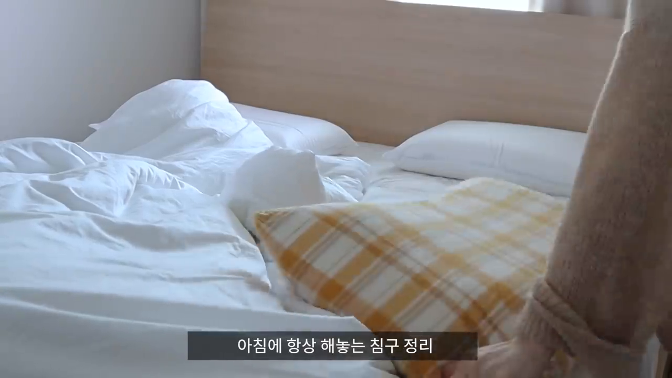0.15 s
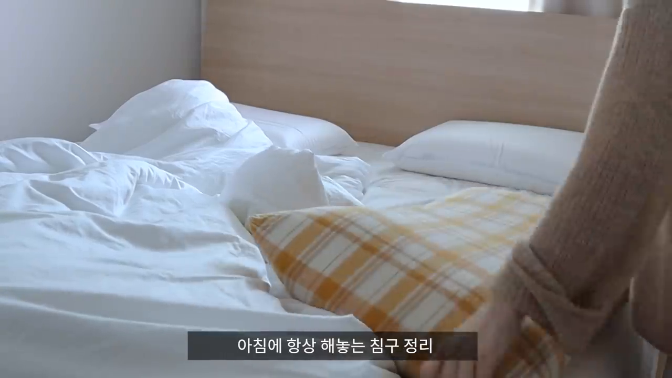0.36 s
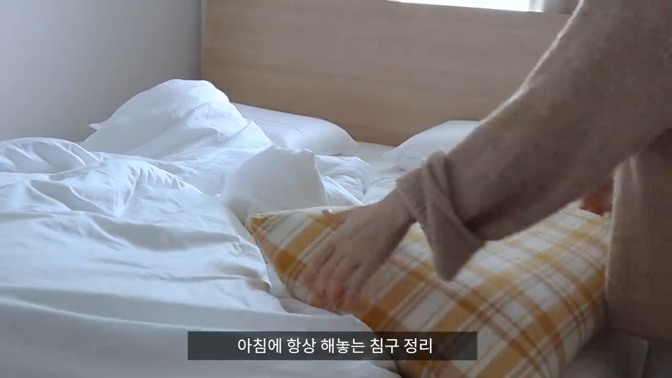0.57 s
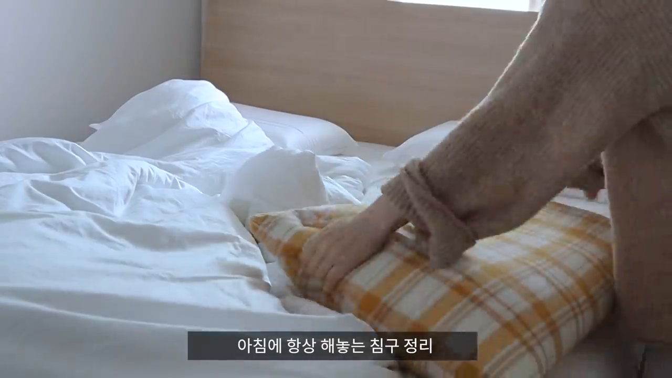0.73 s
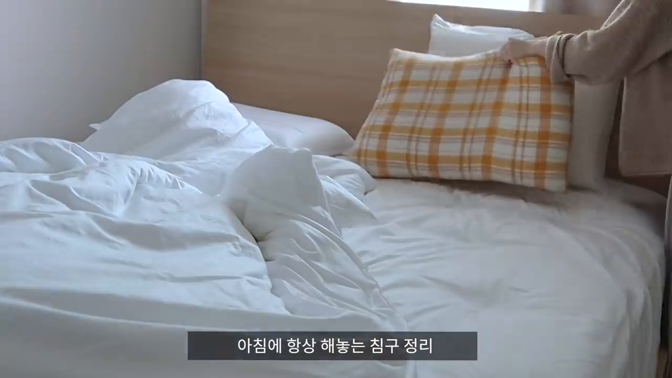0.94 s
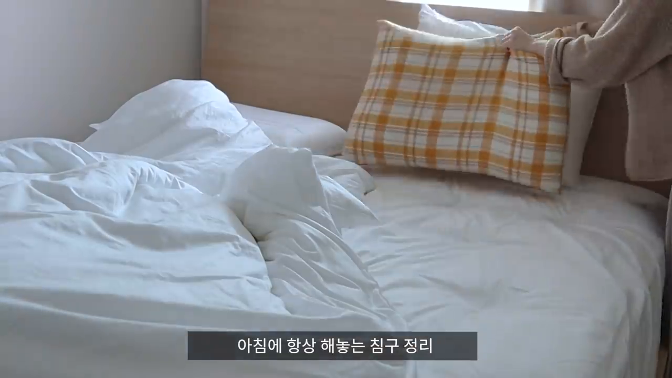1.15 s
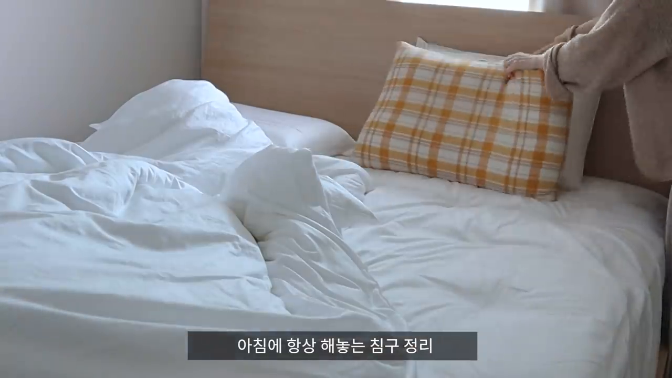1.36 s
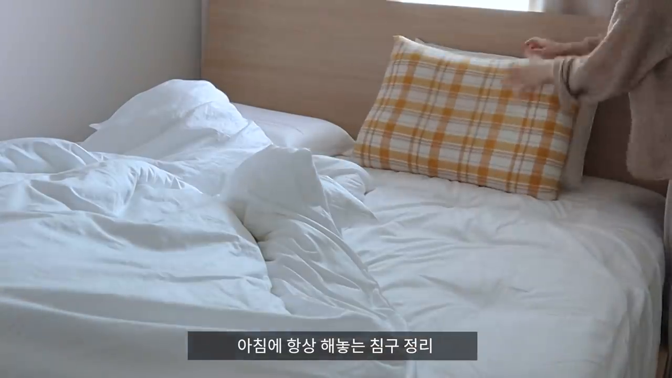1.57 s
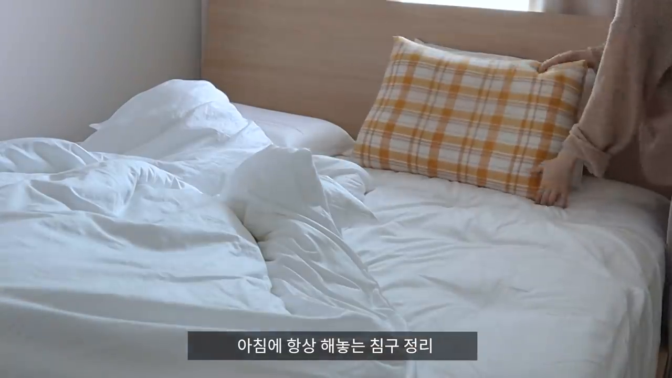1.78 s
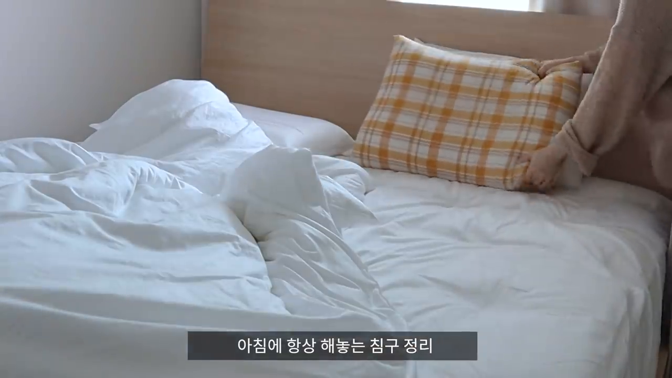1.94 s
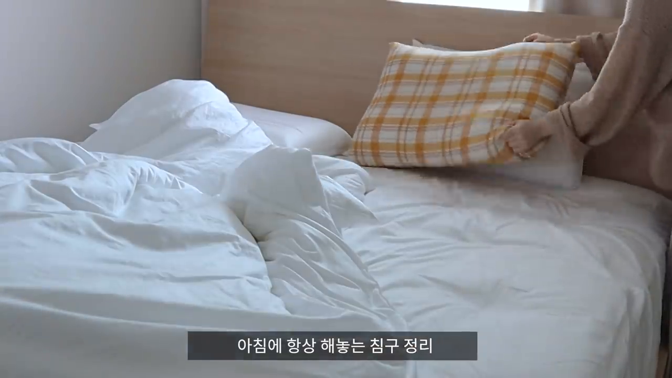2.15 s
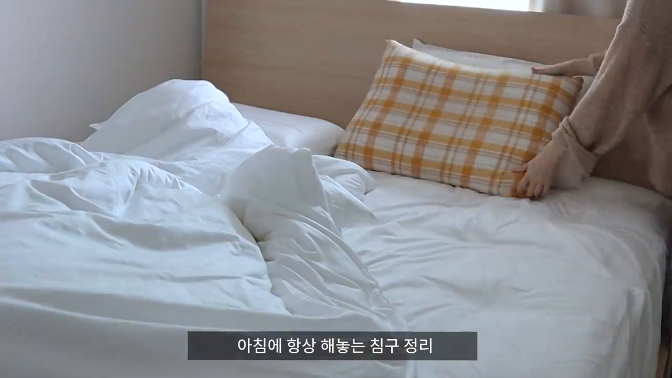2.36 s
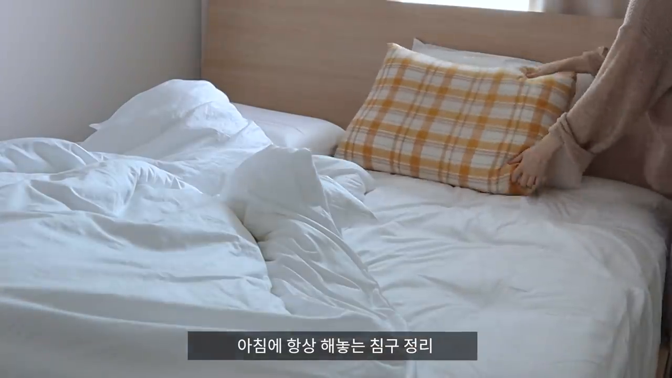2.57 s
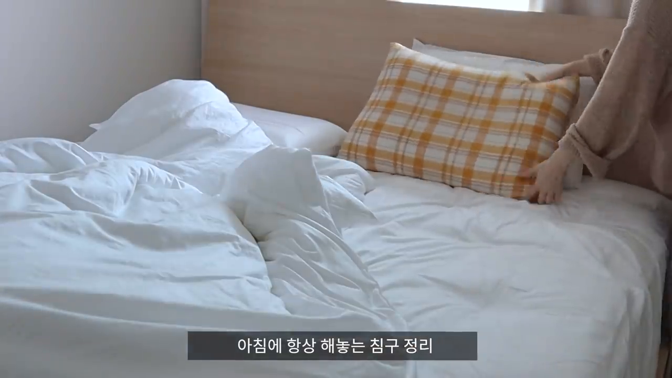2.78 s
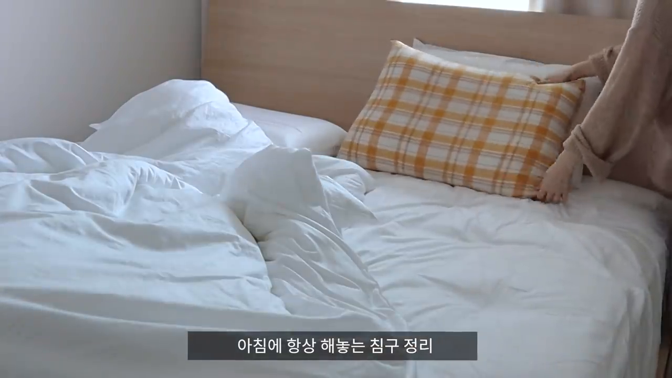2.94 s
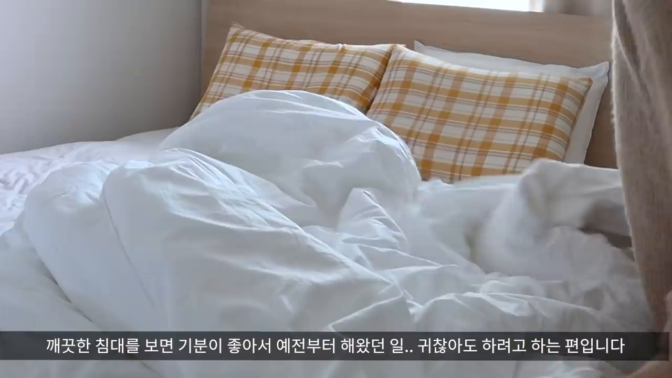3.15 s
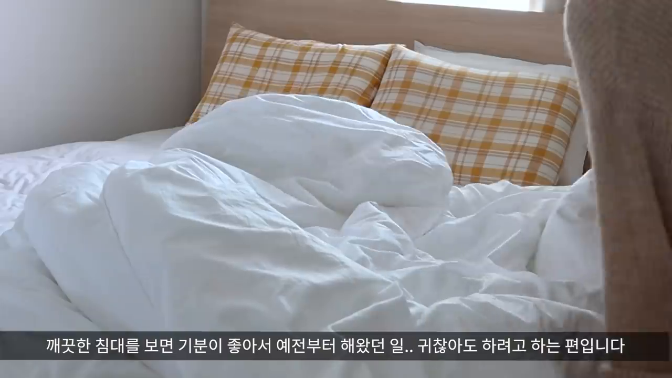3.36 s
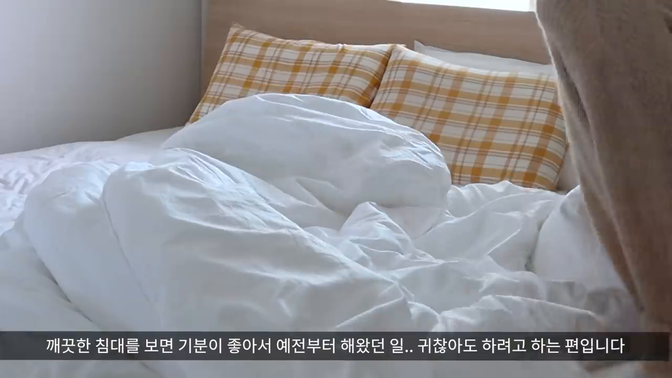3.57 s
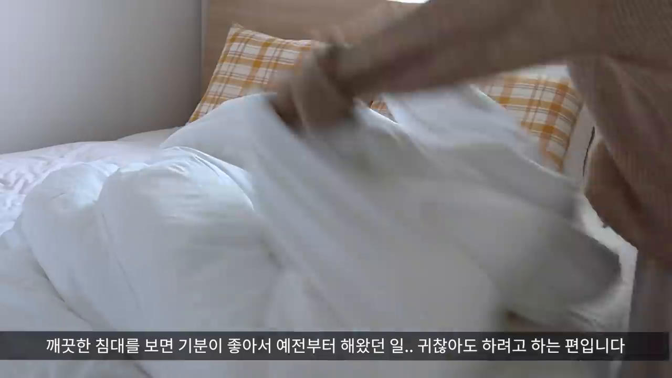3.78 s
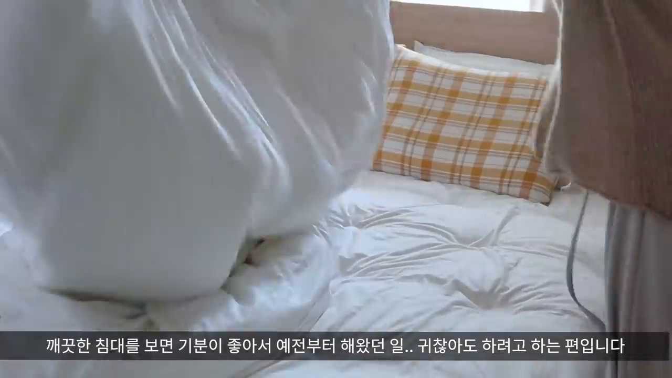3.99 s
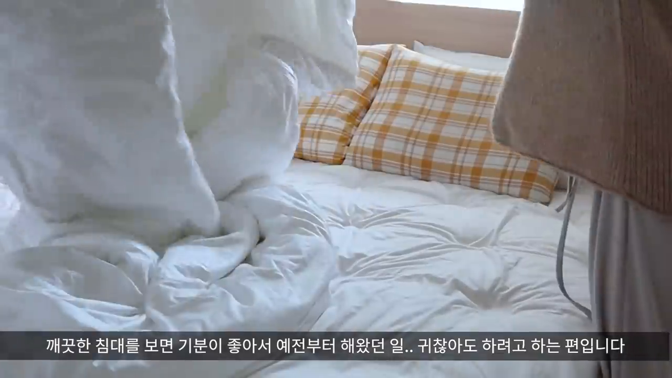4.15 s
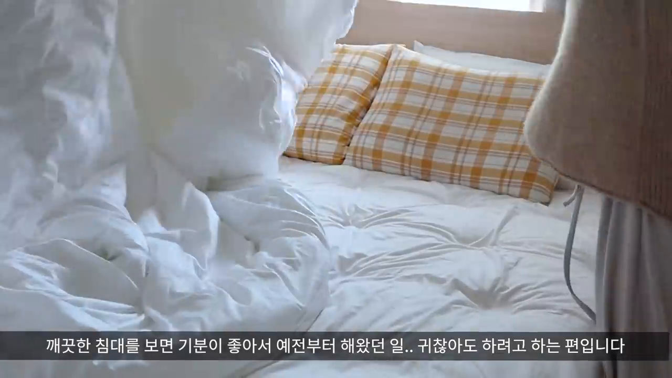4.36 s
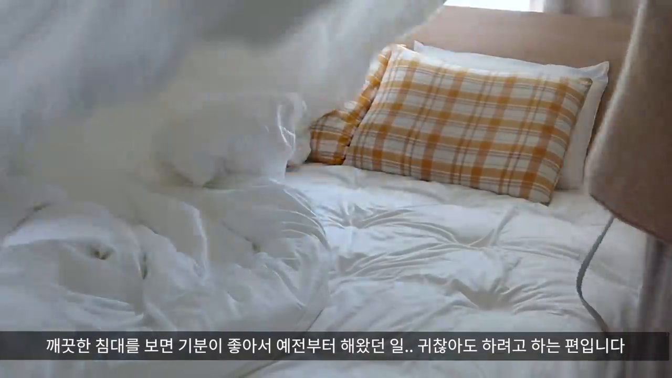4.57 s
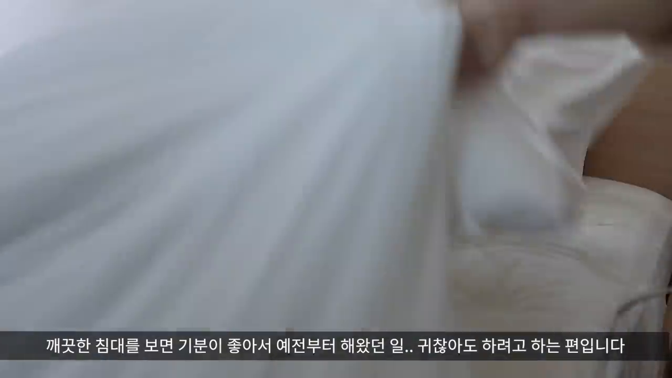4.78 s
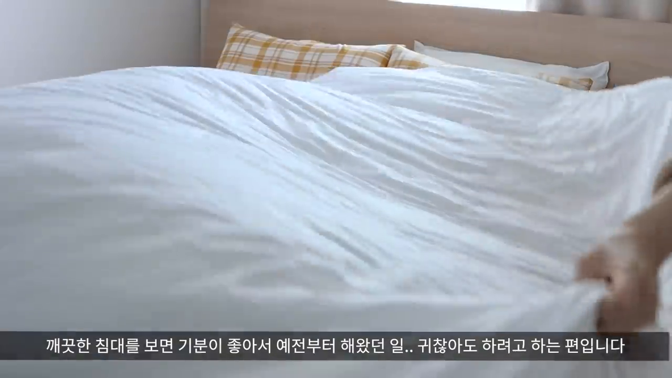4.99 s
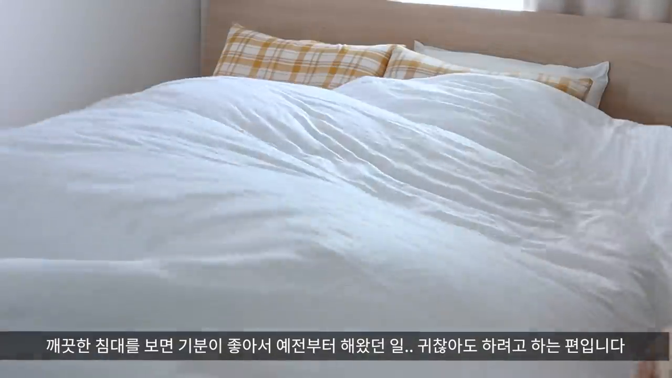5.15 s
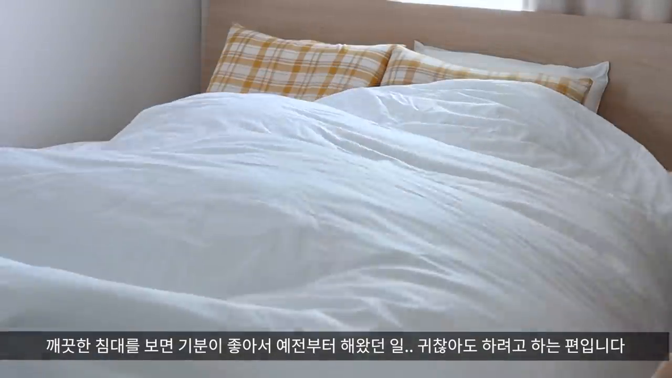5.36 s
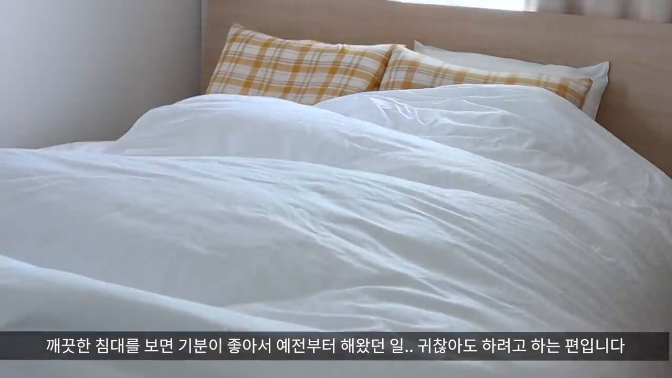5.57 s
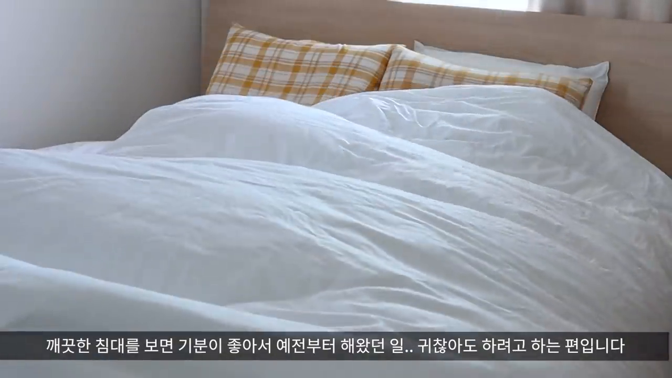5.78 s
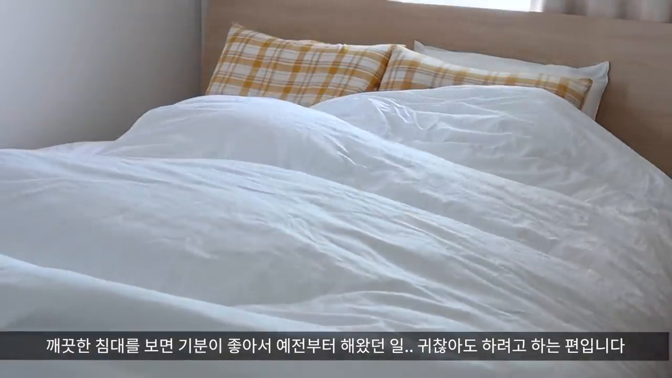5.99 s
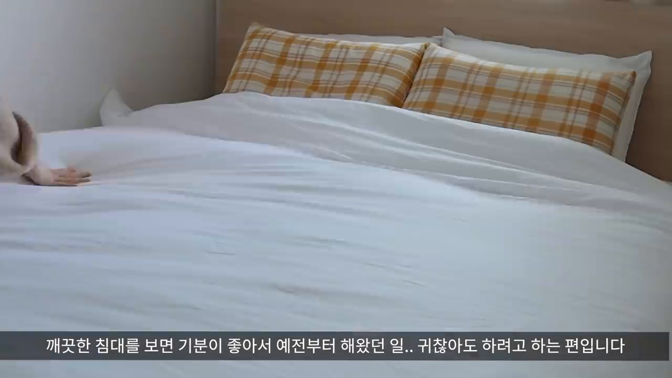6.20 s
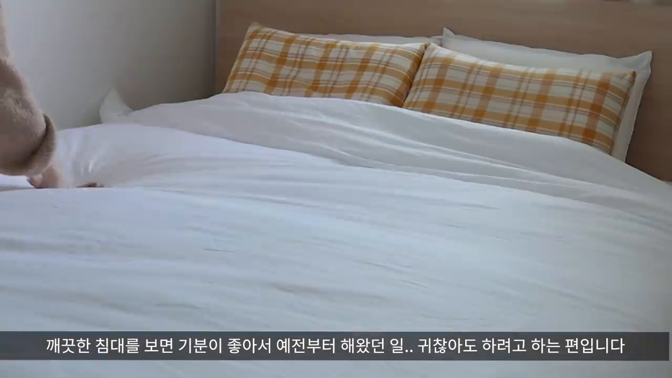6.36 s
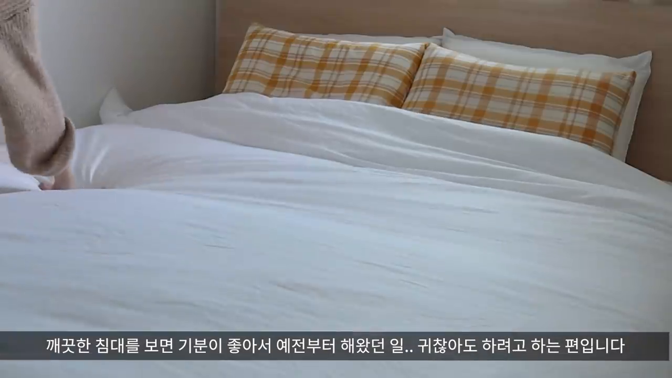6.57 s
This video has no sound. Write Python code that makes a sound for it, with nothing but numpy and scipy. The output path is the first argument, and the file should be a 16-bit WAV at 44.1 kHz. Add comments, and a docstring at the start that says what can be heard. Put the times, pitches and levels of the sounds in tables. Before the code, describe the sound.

Bedding handled by hand, heard closely in stereo in a small soft-sounding bedroom with a faint low hush. First comes a heavy pillow drop, then sparse pats, brief scuffs and rustles. A duvet follows, loudest around four seconds, crumpling and flapping with puffs of low air, a small hollow double knock and a sharp cloth snap. It falls nearly quiet, then ends with a light pat and hissing hand strokes.

```python
"""Making a bed in a small quiet bedroom

A pillow is dropped, stood against the headboard and patted, then the duvet is gathered, shaken out and
smoothed by hand. Crowds of random clicks, coloured and shaped, make folds that pop dully, creases that
crackle and cotton that hisses. Smooth pulses and fading tones make slaps, hollow knocks and a mattress
bounce; slow noise is the stirred air and the hush of the room."""
import sys
import numpy as np
from scipy import signal
from scipy.fft import rfft, irfft, next_fast_len
from scipy.io import wavfile

SR = 44100
rng = np.random.default_rng(int(sys.argv[2]) if len(sys.argv) > 2 else 0)


def dump_mix(stems):
    """Bounce the given channels to the path in sys.argv[1] as a 16-bit WAV at rate SR."""
    frames = np.atleast_2d(stems).T  # one column per channel
    limited = np.clip(frames, -1, 1)  # hard clip at full scale
    pcm = np.round(limited * 32767).astype(np.int16)
    wavfile.write(sys.argv[1], SR, pcm)


N = 292383
TIME = np.arange(N) / SR   # seconds


def moves():
    """Gains of folds, creases and sliding: each move of the hands rises, goes on and dies away; powers add."""
    # From dropping the pillow to smoothing the duvet. Each row: start in seconds, end in seconds,
    # attack in seconds, then relative levels in dB of big folds, small creases and sliding.
    move_list = [(0.061, 0.19, 0.046, -56, -61, -53), (0.234, 0.369, 0.095, -52.5, -51, -51),
                 (0.696, 0.832, 0.11, -56, -51.5, -54.5), (0.858, 1.348, 0.023, -73, -63, -63),
                 (1.348, 1.554, 0.028, -58, -57, -57.5), (1.788, 1.976, 0.0039, -60, -56.5, -60.5),
                 (2.03, 2.159, 0.0046, -48, -51.5, -56), (2.188, 2.49, 0.12, -81, -58, -60.5),
                 (2.533, 2.72, 0.062, -59.5, -57.5, -63), (2.794, 3.075, 0.022, -64.5, -58, -63.5),
                 (3.212, 3.446, 0.002, -52.5, -49.5, -50.5), (3.435, 3.53, 0.037, -47, -46.5, -54),
                 (3.52, 3.785, 0.28, -43, -43.5, -46.5), (3.687, 3.956, 0.16, -40.5, -39.5, -47.5),
                 (3.951, 4.28, 0.038, -43, -46, -50), (4.29, 4.898, 0.068, -54.5, -53.5, -54.5),
                 (4.867, 4.924, 0.018, -46.5, -43, -44.5), (4.97, 5.22, 0.038, -53.5, -50.5, -53.5),
                 (5.163, 5.543, 0.26, -53.5, -51.5, -51), (5.55, 5.65, 0.017, -61, -78, -57.5),
                 (6.095, 6.151, 0.012, -66, -70, -62.5), (6.223, 6.338, 0.0025, -62, -49, -48),
                 (6.29, 6.577, 0.11, -65, -51, -51.5)]
    growth_db_per_s = 1   # a move gains a little as it goes on
    release_s = np.array([0.068, 0.07, 0.064])[:, None]   # coming to rest: folds, creases, sliding
    settling_db = (-78, -64.5, -69)   # between moves the bedding keeps settling: same three
    uneven_db, uneven_per_s = -0.01, 42   # a minute unsteadiness of the hands

    power = from_db(settling_db)[:, None] ** 2
    for start, end, attack, *levels_db in move_list:
        t = np.maximum(TIME - start, 0)
        effort = np.minimum(t / attack, 1) * from_db(growth_db_per_s * t)
        rest = np.exp(-np.clip((TIME - end) / release_s, 0, 20))
        power = power + (from_db(levels_db)[:, None] * effort * rest) ** 2
    return np.sqrt(power) * from_db(uneven_db * drift(uneven_per_s))


def cloth(spectrum, per_s, spread_db, clump_db, clump_rate):
    """Buckling fabric: tiny snaps that come in clumps, coloured by a spectrum."""
    clumps = from_db(clump_db * drift(clump_rate))
    return rms_one(colour(grains(per_s, spread_db) * clumps, spectrum))


def folds(gain):
    """Big folds buckle seldom and give dull, low pops."""
    # Tone of the folds. Each row: frequency in Hz, relative level in dB.
    fold_tone = [(50, 5.5), (100, -4), (160, 5.5), (300, -0.5), (550, 2.5), (800, 1.5), (1300, -10),
                 (3000, -53), (8000, -61)]
    return from_db(2.5) * gain * cloth(fold_tone, per_s=1400, spread_db=2.5, clump_db=2.0, clump_rate=50)


def creases(gain):
    """Small creases buckle more often and give a brighter crackle."""
    # Tone of the creases. Each row: frequency in Hz, relative level in dB.
    crease_tone = [(200, -8.5), (500, -1), (900, 1), (1500, 2), (2300, -4), (3300, -8), (5000, -15),
                   (9000, -61), (16000, -43)]
    return from_db(-1.0) * gain * cloth(crease_tone, per_s=5000, spread_db=2.5, clump_db=0.5, clump_rate=40)


def slide(gain):
    """Sliding cotton makes so many tiny snaps that they merge into a fine hiss."""
    # Tone of the hiss. Each row: frequency in Hz, relative level in dB.
    slide_tone = [(600, -2.5), (1800, 3.5), (3500, 2.5), (5300, 0), (7000, -2.5), (9000, -4.5), (11700, -3),
                  (13000, -10), (15000, -28.5)]
    return from_db(1.5) * gain * cloth(slide_tone, per_s=12000, spread_db=2.0, clump_db=1.07, clump_rate=36)


def flaps(clicks):
    """Pats and flaps of loose cloth start sharply, then die away as the folds stop snapping."""
    # Each row: start in seconds, relative level in dB, fall in seconds, high edge in Hz.
    flap_list = [(0.169, -24, 0.01, 560), (.18, -24, .007, 447), (0.164, -39, 0.072, 2350),
                 (1.38, -41, 0.012, 800), (1.445, -34, 0.014, 650), (1.802, -41.5, 0.0068, 600),
                 (2.032, -31.5, 0.044, 960), (2.124, -31, 0.0079, 1000), (2.15, -34.5, 0.022, 650),
                 (2.855, -47, .025, 450), (3.223, -27.5, 0.029, 1090), (3.232, -20.5, 0.0075, 800),
                 (3.256, -28.5, .012, 1090), (3.275, -32, 0.018, 804), (3.477, -33.5, 0.012, 910),
                 (3.501, -31, 0.017, 1600), (3.729, -32, 0.013, 700), (3.757, -26.5, 0.017, 900),
                 (3.824, -25.5, 0.016, 700), (3.846, -22.5, 0.022, 670), (3.891, -25, 0.025, 1700),
                 (3.901, -24, 0.014, 1120), (3.914, -28, 0.017, 700), (3.946, -20, 0.013, 1400),
                 (3.955, -21.5, 0.0074, 700), (3.978, -27, 0.016, 560), (4.062, -23.5, 0.016, 650),
                 (4.078, -29, 0.027, 1700), (4.102, -26.5, 0.019, 1000), (4.135, -27, 0.019, 910),
                 (4.266, -25, 0.0081, 750), (4.291, -27.5, 0.012, 363), (4.357, -31.5, 0.012, 500),
                 (4.397, -30.5, 0.011, 475), (4.755, -35.5, 0.051, 850), (4.805, -41, .018, 900),
                 (4.89, -28, 0.013, 1770), (4.903, -24.5, 0.021, 485), (5.034, -36.5, .016, 750),
                 (5.193, -41, .02, 600), (5.489, -38, 0.034, 554), (6.024, -43.5, 0.024, 700),
                 (6.223, -31.5, 0.017, 400), (6.603, -40.5, 0.045, 330)]
    rise_s, low_hz = 0.0006, 159
    return sum(avalanche(clicks, s, db, strike(rise_s, fall), low_hz, high_hz)
               for s, db, fall, high_hz in flap_list)


def snaps(clicks):
    """Single creases snap through: thin, sharp bursts."""
    # Each row: start in seconds, relative level in dB, fall in seconds, low edge in Hz, high edge in Hz.
    snap_list = [(0.17, -36, 0.0057, 650, 860), (1.386, -46, 0.014, 5500, 12200),
                 (1.388, -38.5, 0.0074, 700, 1400), (2.033, -39, .03, 900, 2390),
                 (2.806, -49, 0.022, 600, 1500), (3.224, -32, 0.039, 1310, 2150),
                 (3.358, -45, 0.0045, 4200, 11000), (3.441, -34, 0.0053, 900, 3000),
                 (3.483, -40, .02, 1300, 3400), (3.523, -33, 0.0078, 500, 2580),
                 (3.76, -37, .012, 1200, 3000), (3.894, -30.5, 0.012, 2000, 4940),
                 (3.946, -27, 0.015, 800, 2200), (4.475, -44, 0.0064, 800, 2600),
                 (4.757, -33.5, 0.01, 597, 1080), (4.89, -30, 0.0034, 450, 1400),
                 (5.145, -32, 0.008, 600, 2430), (6.022, -42.5, 0.0084, 1300, 3200),
                 (6.147, -49, .009, 1200, 3600)]
    rise_s = 0.00064
    return sum(avalanche(clicks, s, db, strike(rise_s, fall), low_hz, high_hz)
               for s, db, fall, low_hz, high_hz in snap_list)


def thuds(clicks):
    """The weight of the bedding meets the mattress: deep bursts with a softer start."""
    # Each row: start in seconds, relative level in dB, fall in seconds.
    thud_list = [(.164, -25, .02), (1.432, -33, 0.026), (3.225, -26.5, 0.041), (4.898, -26, 0.027),
                 (6.224, -33, 0.037), (6.606, -35.5, .03)]
    rise_s, low_hz, high_hz = 0.0078, 62, 187
    return sum(avalanche(clicks, s, db, strike(rise_s, fall), low_hz, high_hz) for s, db, fall in thud_list)


def scuffs():
    """Cloth rubs over the sheet, the headboard or itself, catching and slipping as it swells and fades."""
    # Each row: middle in seconds, half-width in seconds, relative level in dB, low edge in Hz, high edge in Hz.
    scuff_list = [(.168, 0.0086, -35, 350, 806), (.32, 0.02, -40, 400, 480), (.365, 0.014, -42, 550, 1300),
                  (.345, 0.032, -44, 4960, 10300), (1.405, 0.026, -40, 110, 540),
                  (1.457, 0.017, -36, 230, 507), (1.505, 0.042, -46.5, 129, 432),
                  (1.905, 0.011, -36.5, 700, 2600), (1.91, 0.014, -52.5, 5000, 12000),
                  (2.112, 0.017, -27, 890, 2360), (2.114, 0.013, -48, 4500, 11300),
                  (2.135, 0.025, -31, 400, 1350), (2.305, 0.0071, -45.5, 700, 1900),
                  (2.395, 0.028, -47, 450, 910), (2.62, 0.046, -40, 620, 920),
                  (3.065, 0.013, -46.5, 700, 2230), (3.43, 0.016, -38, 500, 1100),
                  (4.255, 0.0085, -31, 170, 950), (4.85, 0.032, -42.5, 1300, 4050),
                  (5.09, .014, -43, 700, 2100), (5.175, 0.018, -46, 4930, 11400),
                  (5.675, .014, -53, 5030, 11900), (6.11, 0.018, -55, 5000, 12000),
                  (6.3, 0.052, -47, 2000, 4500)]
    rasp_db, rasp_per_s = 2.1, 260   # depth and rate of the catching
    slips = grains(per_s=9000, spread_db=1.9) * from_db(rasp_db * drift(rasp_per_s))
    out = np.zeros((2, N))
    for s, width, db, low_hz, high_hz in scuff_list:
        lead = min(4 * width, s)   # time from the start to the loudest moment
        swell = bell(lead, width)[:SR // 2]
        out += avalanche(slips, s - lead, db, swell, low_hz, high_hz)
    return out


def avalanche(clicks, s, db, swell, low_hz, high_hz, crisp_db=-23):
    """A burst of snapping folds that starts at s and follows the swell."""
    out, at = np.zeros((2, N)), int(s * SR)
    swell = swell[:N - at]
    burst = clicks[:, at:at + len(swell)] * swell
    # the cotton cover adds a crisp edge above the dull body
    body = band(burst, low_hz, high_hz, order=4)
    crisp = from_db(crisp_db) * band(burst, high_hz, 2 * high_hz)
    even = np.array([rms_one(part) for part in body + crisp])
    out[:, at:at + len(swell)] = from_db(db) * even * np.sqrt(np.mean(swell ** 2))
    return out


def blows():
    """Flaps, snaps and thuds share one stream of clicks; scuffs have their own, and knocks join in the middle."""
    # Stereo width of the bursts. Each row: frequency in Hz, side minus mid in dB.
    flap_width = [(40, -36), (120, -57), (400, -18), (800, -6), (2000, -2.5), (6000, 6.5)]
    clicks = grains(per_s=4000, spread_db=2.5)
    bursts = flaps(clicks) + snaps(clicks) + thuds(clicks) + scuffs()
    return stereo(from_db(-7.0) * bursts, flap_width) + knocks()


def knocks():
    """Soft contacts ring a few short modes of a hollow body, sinking in pitch."""
    # Light hollow knocks. Each row: start in seconds, relative level in dB, pitch ratio reached at the end.
    knock_list = [(.600, -41, 1.08), (1.431, -29, 0.72), (1.445, -30, 0.79), (4.466, -30, 1.01),
                  (4.480, -25.5, .98), (6.147, -41, 1.06)]
    # Ways the body rings. Each row: frequency in Hz at pitch ratio 1, relative level in dB,
    # time to fade by 60 dB in seconds.
    ring_modes = [(540, 0, 0.065), (585, -3.5, 0.054), (748, -4.5, 0.042), (1120, -26, 0.04)]
    bend, bend_s = 0.17, 0.0096   # the pitch starts this share high and sinks as the contact relaxes
    attack_s = 0.0028
    out = np.zeros(N)
    for s, db, pitch in knock_list:
        at = int(s * SR)
        t = TIME[:min(SR // 4, N - at)]
        turn = 2 * np.pi * pitch * np.cumsum(1 + bend * np.exp(-t / bend_s)) / SR
        ring = sum(from_db(mode_db - 60 * t / t60) * np.sin(hz * turn) for hz, mode_db, t60 in ring_modes)
        out[at:at + len(t)] += from_db(db) * ring * (1 - np.exp(-t / attack_s))
    return out


def swishes():
    """Threads pass under the hand at a rate that follows its speed: a gliding band of noise."""
    # A hand speeding up or slowing over the weave. Each row: start in seconds, length in seconds,
    # start frequency in Hz, end frequency in Hz, relative level in dB.
    swish_list = [(0.245, 0.2, 5140, 5940, -49.5), (1.889, 0.06, 2270, 4710, -51),
                  (5.547, .1, 5040, 8230, -53.5), (6.335, 0.099, 2355, 1440, -46)]
    rub = rms_one(band(rng.standard_normal((2, N)), 26, 900))   # slow noise blurs the tone into a band
    out = np.zeros((2, N))
    for s, length, start_hz, end_hz, db in swish_list:
        way = np.clip((TIME - s) / length, 0, 1)
        phase = 2 * np.pi * np.cumsum(start_hz + (end_hz - start_hz) * way) / SR
        out += from_db(db) * np.sin(np.pi * way) * rub * np.sin(phase)
    return out


def slaps():
    """Air slapped out as cloth lands flat or snaps taut: one smooth pressure pulse each."""
    # Each row: middle in seconds, peak in dB before filtering, pulse width in seconds.
    slap_list = [(.170, -8, 0.00085), (0.198, -21, 0.00051), (0.213, -18.5, 0.0015),
                 (3.9468, -14.5, 0.0001), (3.9543, -27, 0.00054), (4.8923, -19.5, 0.00025),
                 (5.1464, -22, 0.000067)]
    pulses = sum(from_db(db) * bell(s, width) for s, db, width in slap_list)
    return -band(pulses, 16, 9000)


def bounce():
    """The mattress gives under the pillow and swings back, heavily damped: a short deep tone."""
    start_s, hz, level_db, t60_s = 0.175, 44.4, -27, 0.27   # t60: time to fade by 60 dB
    t = np.clip(TIME - start_s, 0, 1)
    return from_db(level_db - 60 * t / t60_s) * np.sin(2 * np.pi * hz * t)


def draught():
    """Low rumble of stirred air, swelling as the broadest sweeps push a puff at the microphone."""
    # Each row: middle of the puff in seconds, level in dB.
    puff_list = [(1.43, -37), (3.25, -42), (3.9, -33), (4.13, -40), (4.27, -34.5), (4.77, -42),
                 (4.91, -36.5), (6.54, -46)]
    # Tone of the rumble. Each row: frequency in Hz, relative level in dB.
    air_tone = [(12, -7), (25, -23.5), (42, -3), (70, -2), (110, -8), (250, -24.5), (1000, -68)]
    half_width_s, steady_db = 0.022, -57.5
    flow = from_db(steady_db) + sum(from_db(db) * bell(s, half_width_s) for s, db in puff_list)
    return flow * rms_one(colour(rng.standard_normal(N), air_tone))


def bedroom(x):
    """A small room adds a few resonances and a short, dull tail of echoes."""
    # Resonances of the room. Each row: frequency in Hz, width in Hz, level in dB.
    room_modes = [(168.3, 18, 3.5), (263.3, 41, 2.5), (358, 225, -2.5), (900, 19, -17), (1200, 20, -32),
                  (2028, 39, -1)]
    t60_s, wet_db = 0.15, -13.0   # the tail's time to fade by 60 dB, and its level
    t = TIME[:SR // 3]
    echoes = rng.standard_normal((2, len(t))) * from_db(-60 * t / t60_s)
    tail = band(echoes * (t > .005), 270, 4100)   # the first echo comes after 5 ms
    tail /= np.sqrt(np.sum(tail ** 2) / 2)
    standing = sum(from_db(db) * resonate(x, hz, width_hz) for hz, width_hz, db in room_modes)
    return x + standing + from_db(wet_db) * signal.fftconvolve(x, tail, axes=1)[:, :N]


def hush():
    """The quiet of the room: steady, wide, soft noise."""
    # Tone of the hush. Each row: frequency in Hz, relative level in dB.
    hush_tone = [(12, -30), (25, -2), (58, -1.5), (100, -9), (270, -14), (450, -16.5), (680, -16.5),
                 (1050, -22.5), (2500, -26.5), (5000, -35.5), (8500, -42.5), (11700, -44.5), (13500, -52),
                 (15400, -62)]
    # Stereo width of the hush. Each row: frequency in Hz, side minus mid in dB.
    hush_width = [(30, -29), (70, -28), (160, -5), (400, 1.5), (1200, 6), (4000, 5.5), (12000, 8)]
    still = from_db(-51) * rms_one(colour(rng.standard_normal((2, N)), hush_tone))
    return stereo(still, hush_width)


def from_db(db):
    """Turn decibels into a gain."""
    return 10 ** (np.asarray(db) / 20)


def rms_one(x):
    """Scale to an average (RMS) strength of 1."""
    return x / np.sqrt(np.mean(x ** 2) + 1e-20)


def colour(x, spectrum):
    """Filter by a table of frequency in Hz and gain in dB, joined smoothly over log frequency."""
    hz, db = np.transpose(spectrum)
    size = next_fast_len(N)
    bins = np.maximum(np.arange(size // 2 + 1) * SR / size, 1)
    gain = from_db(np.interp(np.log(bins), np.log(hz), db))
    return irfft(rfft(x, size) * gain, size)[..., :N]


def drift(rate):
    """Smooth chance with spread 1: random points, rate of them a second, joined by lines."""
    knots = rng.standard_normal(4000)
    return rms_one(np.interp(TIME * rate, np.arange(len(knots)), knots))


def grains(per_s, spread_db):
    """Two trains of random clicks of uneven size, one for mid and one for side."""
    sizes = from_db(spread_db * np.minimum(rng.exponential(1, (2, N)), 4))
    signs = rng.choice([-1, 1], (2, N))
    return rms_one(sizes * signs * (rng.random((2, N)) < per_s / SR))


def strike(rise, fall):
    """Half a second of envelope: a straight rise and an exponential fall."""
    t = TIME[:SR // 2]
    return np.minimum(t / rise, 1) * np.exp(-np.maximum(t - rise, 0) / fall)


def bell(s, width):
    """A smooth hump of height 1 around s."""
    return np.exp(-np.minimum(((TIME - s) / width) ** 2 / 2, 20))


def band(x, low_hz, high_hz, order=2):
    """Keep what lies between two edges; the order sets how steep the upper one is."""
    x = signal.sosfilt(signal.butter(2, low_hz, "high", fs=SR, output="sos"), x)
    return signal.sosfilt(signal.butter(order, min(high_hz, .45 * SR), fs=SR, output="sos"), x)


def resonate(x, hz, width_hz):
    """A resonance with gain 1 on top."""
    r = np.exp(-np.pi * width_hz / SR)
    feedback = [1, -2 * r * np.cos(2 * np.pi * hz / SR), r * r]
    return signal.lfilter(np.array([1, 0, -1]) * (1 - r * r) / 2, feedback, x + 1e-18)


def stereo(pair, width):
    """Left and right from mid and side; the width table sets how strong the side is at each frequency."""
    return pair[0] + colour(pair[1], width) * [[1], [-1]]


def scene():
    """Cloth, blows and moving air over the hush of the room."""
    # Stereo width of folds and creases. Each row: frequency in Hz, side minus mid in dB.
    cloth_width = [(40, -34), (120, -68), (400, -16), (800, -9), (1500, 1), (3000, 2), (8000, -6)]
    # Stereo width of sliding and swishes. Each row: frequency in Hz, side minus mid in dB.
    slide_width = [(1000, -17), (3000, 5), (6000, 5.5), (12000, 6.5)]
    # Where the hands are working. Each row: time in seconds, left minus right in dB.
    place = [(0, -1.5), (1.9, -0.5), (2.6, -0.5), (3.5, -1.8), (4.15, 0.5), (4.9, -0.5), (5.5, -2.1),
             (6.25, 0.3)]

    folding, creasing, sliding = moves()
    buckling = stereo(folds(folding) + creases(creasing), cloth_width)
    bedding = bedroom(buckling + blows())
    cotton = bedding + stereo(slide(sliding) + swishes(), slide_width)
    pan = from_db(np.interp(TIME, *np.transpose(place)) * [[.5], [-.5]])
    return cotton * pan + slaps() + bounce() + draught() + hush()


def record(dry):
    """The treble is cut steeply above 15400 Hz."""
    return signal.sosfilt(signal.ellip(10, .1, 80, 15400, fs=SR, output="sos"), dry)


dry = scene()
out = record(dry)
dump_mix(out)
```